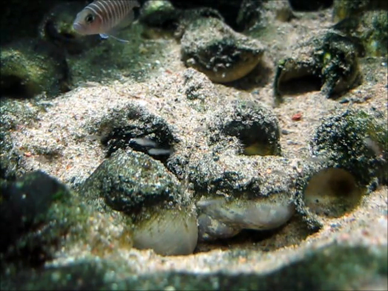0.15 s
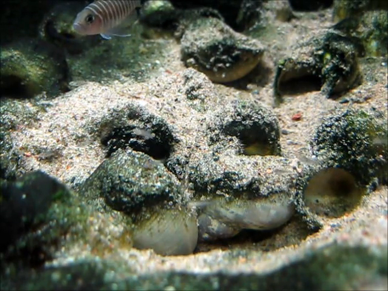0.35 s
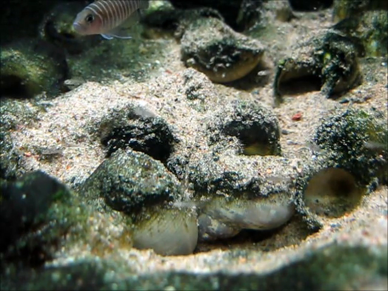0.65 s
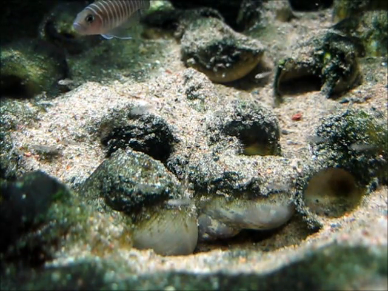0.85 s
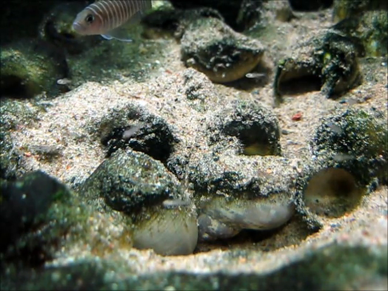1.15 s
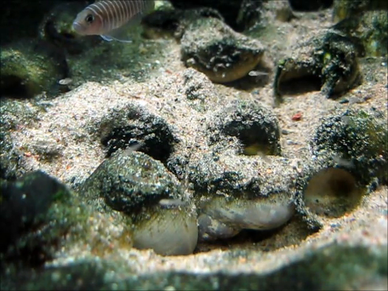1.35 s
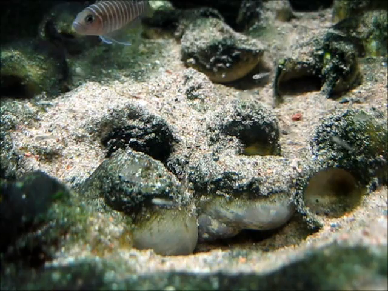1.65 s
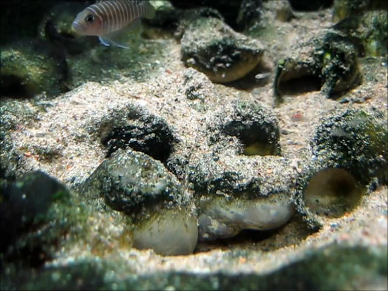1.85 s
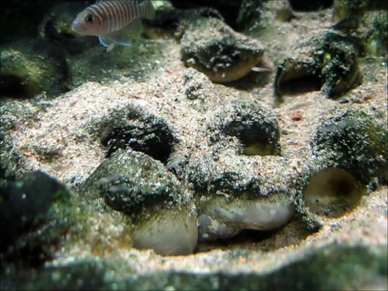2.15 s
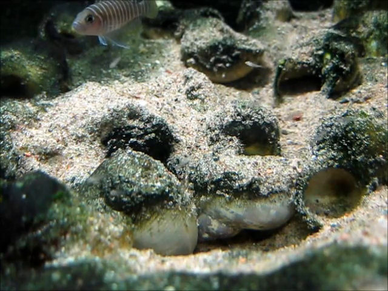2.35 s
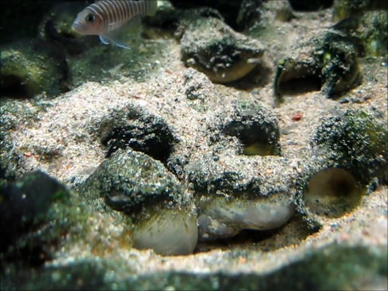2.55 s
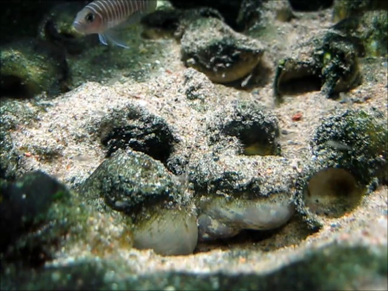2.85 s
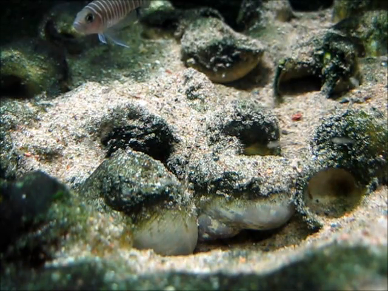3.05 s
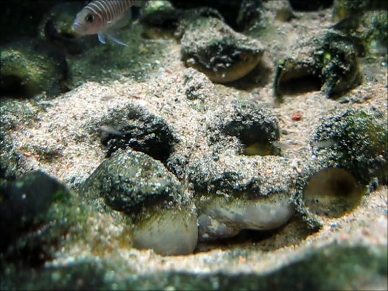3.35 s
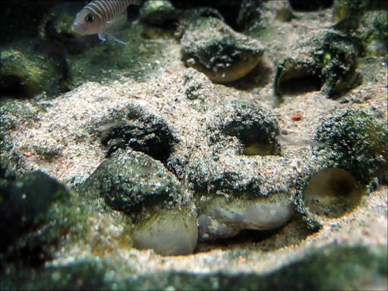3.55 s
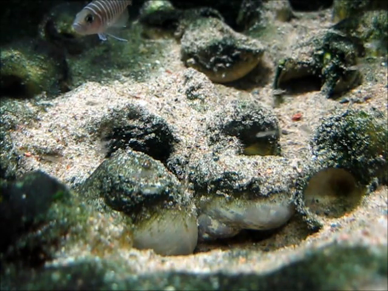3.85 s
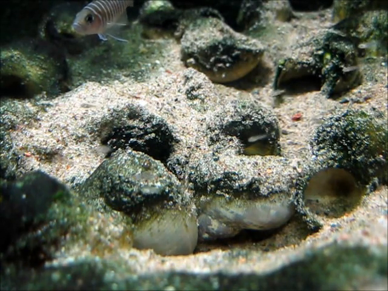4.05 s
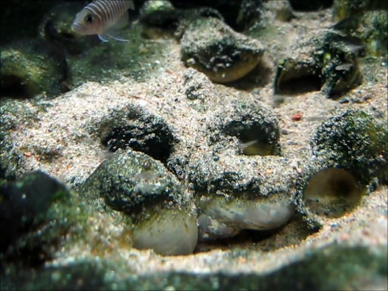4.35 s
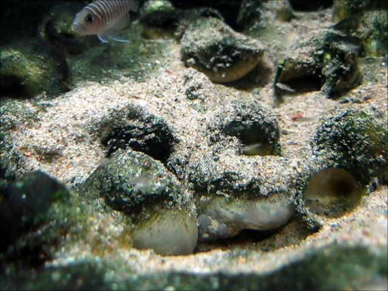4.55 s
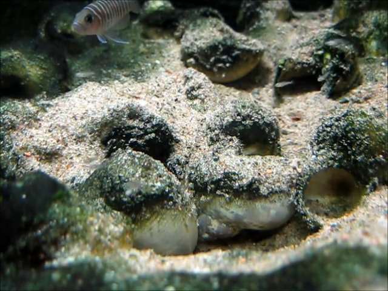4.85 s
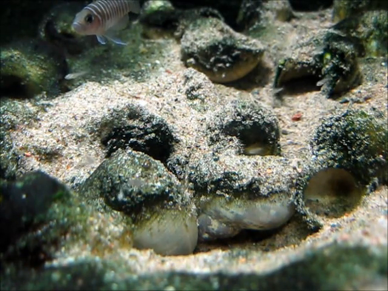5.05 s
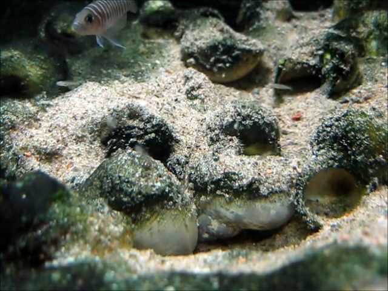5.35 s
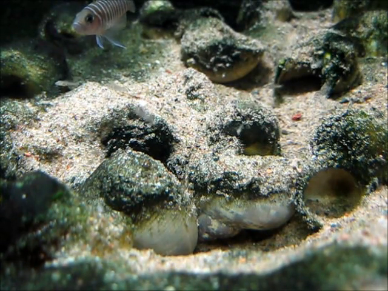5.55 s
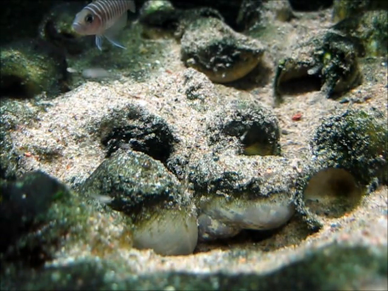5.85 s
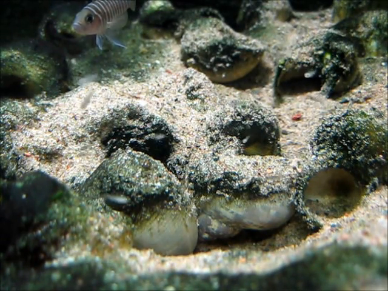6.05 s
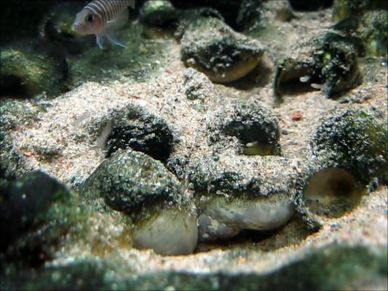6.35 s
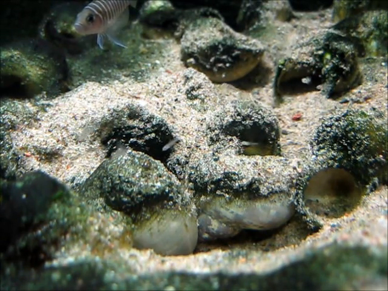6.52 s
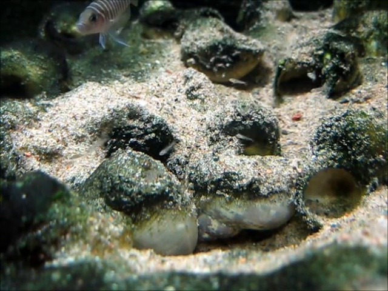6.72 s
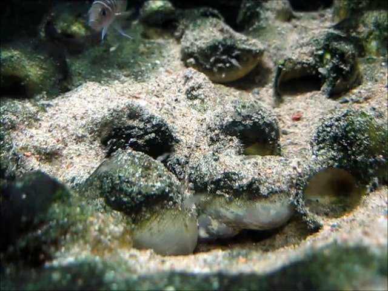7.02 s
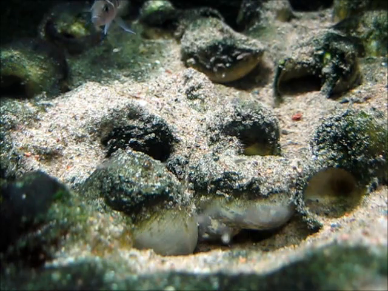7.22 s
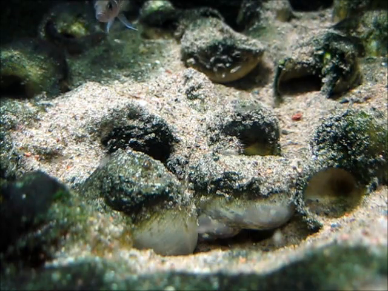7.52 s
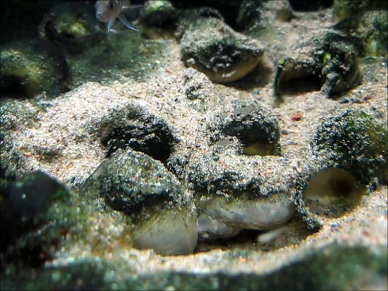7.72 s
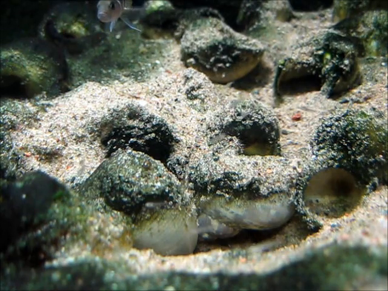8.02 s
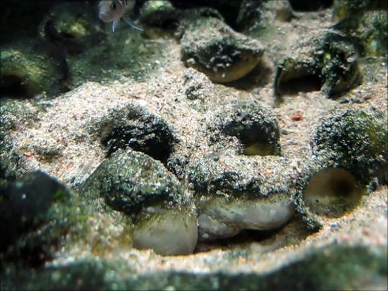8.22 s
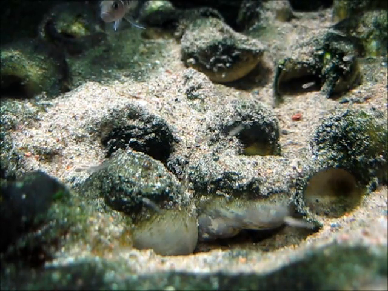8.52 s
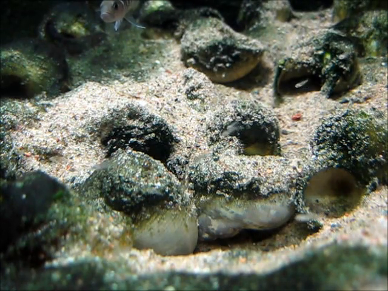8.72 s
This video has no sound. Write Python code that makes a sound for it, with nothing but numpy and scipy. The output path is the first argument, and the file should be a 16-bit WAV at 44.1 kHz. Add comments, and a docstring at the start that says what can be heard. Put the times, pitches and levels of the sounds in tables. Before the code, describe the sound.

A fish tank pump hums low and steady with a buzzing rattle, over soft water rumble, faint gurgling and tiny crackling bubble pops.

```python
"""The filter pump of a fish tank runs steadily: its motor hums in a stack of pure tones, while its impeller
knocks once a turn and churns the water, ringing the resonances of housing and tank.
Circulating water is noise rumbling in low resonances; bubbles in the outflow gurgle as short gliding tones.
At the surface tiny bubbles fizz and larger ones pop, made of clicks, noise puffs and brief tones that ring
the air gap under the lid. A faint steady hiss of shaped noise lies under it all."""
import sys
import numpy as np
from scipy import signal
from scipy.fft import rfft, irfft, next_fast_len
from scipy.io import wavfile
from scipy.ndimage import map_coordinates

SR = 44100
rng = np.random.default_rng(int(sys.argv[2]) if len(sys.argv) > 2 else 0)


def wav_out(sig):
    """Save sig, one row per channel (or a flat mono array), as 16-bit PCM at SR to the path in sys.argv[1]."""
    wavfile.write(sys.argv[1], SR, np.round(np.clip(np.atleast_2d(sig).T, -1, 1) * 32767).astype(np.int16))


N = 391608

TURN_HZ = 59.995  # turns of the pump shaft per second
TOP_HZ = 15750  # no sound is kept from here up

# Steady tones of the pump motor: (multiple of the shaft speed, peak level [dB])
MOTOR_TONES = [(1, -48.5), (2, -30), (3, -54), (4, -56.5), (5, -51.5), (6, -54), (7, -52.5), (8, -50.5),
               (9, -54), (10, -46.5), (13, -60.5), (14, -52.5), (16, -54), (17, -53), (20, -72.5)]
# Resonances of pump housing and tank walls, before mixing: (pitch [Hz], half width [Hz], level [dB per Hz])
TANK_RESONANCES = [(273, 21, -66.5), (318.4, 39, -72), (420.7, 29.7, -68.5), (462, 25, -74),
                   (616.4, 46.4, -64), (671.4, 44.5, -62.5), (799, 56.4, -66.5), (1014.4, 59, -66),
                   (1094, 13, -68), (1237, 50, -77.5), (1460, 150, -89.5), (1690, 24, -89.5),
                   (1976, 223, -91), (2204, 23, -87.5), (2452, 30, -93.5), (2816, 51, -93.5),
                   (3110, 84, -96.5)]
# Low resonances of the filled tank on its stand, before mixing:
# (pitch [Hz], half width [Hz], level [dB per Hz])
STAND_RESONANCES = [(29.6, 8.5, -73.5), (87, 4.9, -59.5), (109, 31.6, -65.5), (146, 35, -71.5),
                    (184.5, 62, -71)]
# Ringing of the air gap over the water: (pitch [Hz], half width [Hz], relative level [dB])
AIR_GAP_RESONANCES = [(4900, 3000, -11), (6360, 150, -3), (6960, 280, -8.5), (7740, 180, -5.5),
                      (8250, 260, -3), (8950, 110, -3.5), (9400, 700, -8), (10400, 240, -4.5),
                      (11300, 3800, -13)]
# The loudest bursting bubbles, before mixing: (time [s], level [dB], pitch [Hz])
LOUD_POPS = [(0.6454, -44.5, 6840), (1.068, -50, 8940), (1.7863, -46, 10500), (2.1705, -50, 4830),
             (2.7826, -50, 8700), (3.0859, -48, 6750), (3.8581, -50, 8340), (4.153, -48, 10540),
             (4.5022, -49, 10460), (4.702, -48, 10500), (4.8688, -50, 6910), (5.1158, -47, 3730),
             (6.55, -49, 6460), (6.9536, -47, 6670), (7.5368, -48, 10500), (7.9613, -49, 10460),
             (8.1204, -46.5, 9050)]
# Steady hiss: (frequency [Hz], level [dB per Hz])
HISS_LEVELS = [(100, -101), (2500, -102), (4000, -103.5), (5500, -105.5), (9000, -106.7), (12000, -107.5),
               (15500, -108)]
# Part of the rattle's power that comes from knocks, the rest being churned water:
# (frequency [Hz], share [0-1])
KNOCK_POWER_SHARE = [(250, 0.07), (480, 0.09), (660, 0.35), (1000, 0.78), (1250, 0.5), (1550, 0.07),
                     (3000, .2)]

# Fainter pops: middle level and its scatter either way [dB], pitch scatter either way [share of the pitch]
FAINT_DB, FAINT_SCATTER_DB, FAINT_DETUNE = -52, 0.5, 0.022

TIME = np.arange(N) / SR  # [s]
SIZE = 2 * next_fast_len(N // 2 + SR // 2)  # room for filter tails [samples]
FREQ = np.fft.rfftfreq(SIZE, 1 / SR)  # [Hz]


def amp(db):
    """Turn decibels into a gain."""
    return 10 ** (np.asarray(db) / 20)


def unit(x):
    """Scale a sound to an rms (average strength) of 1."""
    return x / np.sqrt(np.mean(x ** 2) + 1e-20)


def wobble(rate):
    """Draw one random value that stays nearly constant over the whole sound; `rate` barely moves it."""
    points = rng.standard_normal(int(N * rate / SR) + 4)
    return map_coordinates(points, [TIME * rate / SR])


def filtered(x, response):
    """Pass a sound through a frequency response given on FREQ."""
    return irfft(rfft(x, SIZE) * response, SIZE)[:N]


def per_hz(x):
    """Scale a white (equally strong at all pitches) sound to 0 dB per Hz."""
    return unit(x) * np.sqrt(SR / 2)


def along(points):
    """Join (frequency, value) points on a log frequency axis and read them on FREQ."""
    hz, value = np.transpose(points)
    return np.interp(np.log(FREQ + 1), np.log(hz), value)


def body(modes):
    """Build the response of steep-sided resonances that ring only after they are struck."""
    power = sum(amp(db) ** 2 / (1 + ((FREQ - hz) / width) ** 2) ** 2 for hz, width, db in modes)
    # Folding the cepstrum onto positive times gives the phase of a response that never rings early
    cepstrum = irfft(np.log(power + 1e-16) / 2)
    cepstrum[1:SIZE // 2] *= 2
    cepstrum[SIZE // 2 + 1:] = 0
    return np.exp(rfft(cepstrum))


def hum(tank, waver_db):
    """The motor's push gives steady tones, phase-shifted by the tank; most are set slightly louder or softer at
    random."""
    out = np.zeros(N)
    for order, db in MOTOR_TONES:
        hz = order * TURN_HZ
        phase = np.angle(tank[np.searchsorted(FREQ, hz)])
        # Each tone above the two lowest gets its own small random level offset, independently of the others
        waver = waver_db * wobble(9) if hz > 2.5 * TURN_HZ else 0
        out += amp(db + waver) * np.cos(2 * np.pi * hz * TIME + phase)
    return out


def knocks(lead_s, rebound_s, rebound_db, jitter_s, scatter_db):
    """Once a turn the loose impeller strikes one side of its housing or the other, and rebounds."""
    turns = np.arange(1, int(N / SR * TURN_HZ)) / TURN_HZ - lead_s
    blows = np.zeros(N + SR)
    for delay, db in ((0, 0), (rebound_s, rebound_db)):
        late, size, side = rng.standard_normal((len(turns), 3)).T
        at = np.round((turns + delay + jitter_s * late) * SR).astype(int)
        blows[at] += np.sign(side) * amp(db + scatter_db * size)
    return blows[:N]


def rattle(tank, blows, blade_depth, surge_db):
    """Knocks and the water churned by three blades ring the same housing and tank."""
    blades = np.cos(2 * np.pi * 3 * TURN_HZ * TIME)
    surge = amp(surge_db * wobble(20))
    churn = (1 + blade_depth * blades) * rng.standard_normal(N) * surge
    share = np.clip(along(KNOCK_POWER_SHARE), 0, 1)
    # Square roots because the shares are of power
    knocking = filtered(per_hz(blows), tank * np.sqrt(share))
    churning = filtered(per_hz(churn), tank * np.sqrt(1 - share))
    return knocking + churning


def flow(swell_db):
    """Circulating water, a noise at a randomly set level, rumbles in the tank's low resonances."""
    swell = amp(swell_db * wobble(6))
    return filtered(per_hz(rng.standard_normal(N) * swell), body(STAND_RESONANCES))


def gurgle(count, centre_hz, spread, cycles, glide, spread_db):
    """Bubbles in the outflow each ring for a few cycles, rising in pitch as they near the surface."""
    when, pitch, size = rng.random((count, 3)).T[..., None]
    t = TIME[:SR // 25]
    hz = centre_hz * np.exp(spread * (2 * pitch - 1))
    age = t * hz / cycles
    # Small, high bubbles tend to be quieter
    level = amp(spread_db * size) / hz
    tone = np.sin(2 * np.pi * hz * t * (1 + glide * np.minimum(age, 4)))
    blips = level * np.exp(-age) * tone
    at = (when * N).astype(int) + np.arange(len(t))
    return unit(np.bincount(at.ravel(), blips.ravel(), N)[:N])


def fizz(air_gap, rate, spread_db, pulsing, t60, snap_db):
    """Tiny bubbles burst at random, more often on each pump stroke, and ring the gap under the lid."""
    stroke = np.exp(-6 * ((TIME * TURN_HZ + .08) % 1))
    # `rate` is the bursts per second between strokes
    bursts = rng.random(N) < rate / SR * (1 + pulsing * stroke)
    snaps = bursts * amp(spread_db * np.minimum(rng.exponential(size=N), 3))
    # Every snap scatters into its own short patter of reflections
    fade = amp(-60 * TIME[:SR // 8] / t60)
    power = signal.fftconvolve(snaps ** 2, fade ** 2)[:N]
    patter = unit(np.sqrt(np.abs(power)) * rng.standard_normal(N))
    return unit(filtered(patter + amp(snap_db) * unit(snaps), air_gap))


def faint_pops(count):
    """List faint bubbles (time [s], level [dB], pitch [Hz]), loosely spaced, each near an air gap resonance."""
    when, size, which, detune = rng.random((count, 4)).T
    s = (np.arange(count) + when) / count * N / SR
    db = FAINT_DB + FAINT_SCATTER_DB * (2 * size - 1)
    mode = (which * len(AIR_GAP_RESONANCES)).astype(int)
    hz = np.array(AIR_GAP_RESONANCES)[mode, 0] * (1 + FAINT_DETUNE * (2 * detune - 1))
    return list(zip(s, db, hz))


def pops(air_gap, t60, rise_s, width_hz, ring_t60, ring_db):
    """A larger bubble snaps open, rings briefly at its own pitch and echoes under the lid."""
    out, t = np.zeros(N + SR), TIME[:SR // 10]
    freq = np.fft.rfftfreq(len(t), 1 / SR)
    lid = np.interp(freq, FREQ, air_gap)
    rise = 1 - np.exp(-t / rise_s)
    for s, db, hz in LOUD_POPS + faint_pops(count=26):
        puff = rng.standard_normal(len(t)) * amp(-60 * t / t60) * rise
        # Favour the part of the echo around the bubble's pitch
        near_pitch = 1 / (1 + 1j * (freq - hz) / width_hz)
        echo = irfft(rfft(puff) * lid * near_pitch, len(t))
        ring = np.sin(2 * np.pi * hz * t) * amp(-60 * t / ring_t60) * rise
        pop = echo / np.abs(echo).max() + amp(ring_db) * ring
        out[round(s * SR):][:len(t)] += amp(db) * pop
    return out[:N]


def hiss():
    """Steady random noise, gently weaker towards the treble."""
    return filtered(per_hz(rng.standard_normal(N)), amp(along(HISS_LEVELS)))


def scene():
    """Mix pump, water, bubbles and hiss, as heard from just outside the glass."""
    # Names ending in _s and t60 (time to fade by 60 dB) are seconds, _db decibels, _hz hertz
    tank, air_gap = body(TANK_RESONANCES), body(AIR_GAP_RESONANCES)
    blows = knocks(lead_s=0.000913, rebound_s=0.004014, rebound_db=-2.0, jitter_s=.0004, scatter_db=2)
    pump = hum(tank, waver_db=-0.27)
    pump += amp(-0.19) * rattle(tank, blows, blade_depth=0.36, surge_db=.9)
    water = amp(1.67) * flow(swell_db=2.7)
    water += amp(-70.5) * gurgle(count=320, centre_hz=2110, spread=0.39, cycles=4.3, glide=0.016, spread_db=16)
    bubbles = amp(-70.5) * fizz(air_gap, rate=55, spread_db=3.5, pulsing=9, t60=0.026, snap_db=-3)
    bubbles += amp(-3.5) * pops(air_gap, t60=0.044, rise_s=0.00032, width_hz=610, ring_t60=0.03, ring_db=-6.0)
    return (pump + water + bubbles + hiss())[None]


def record(dry):
    """Cut away everything from TOP_HZ up."""
    return filtered(dry[0], FREQ < TOP_HZ)[None]


dry = scene()
out = record(dry)
wav_out(out)
```